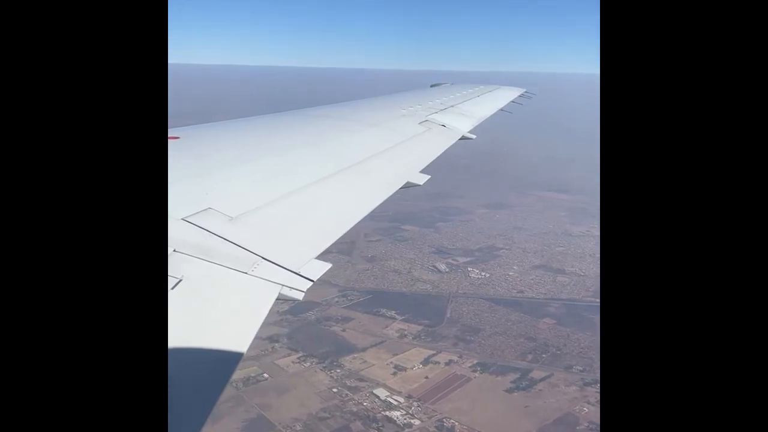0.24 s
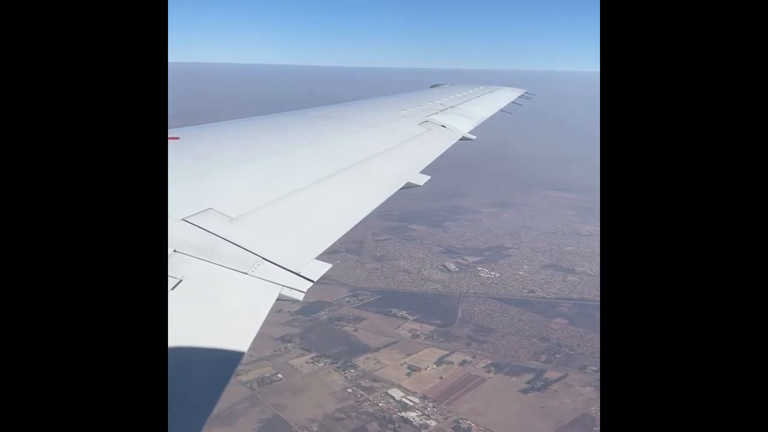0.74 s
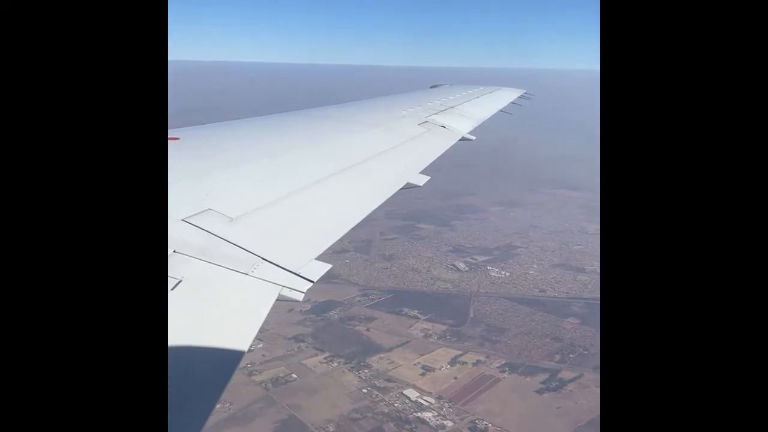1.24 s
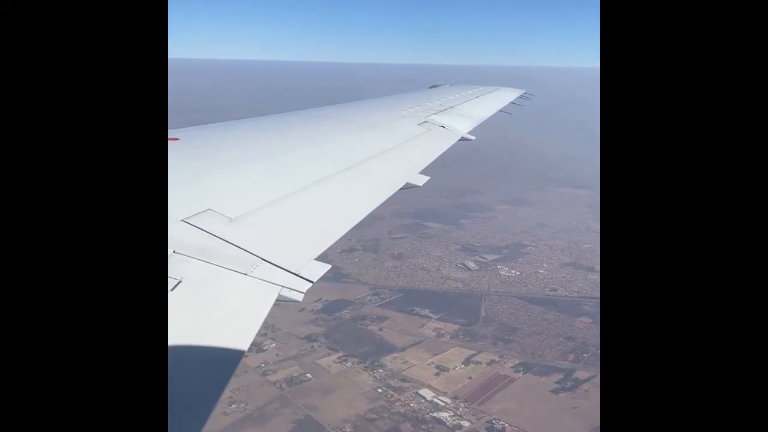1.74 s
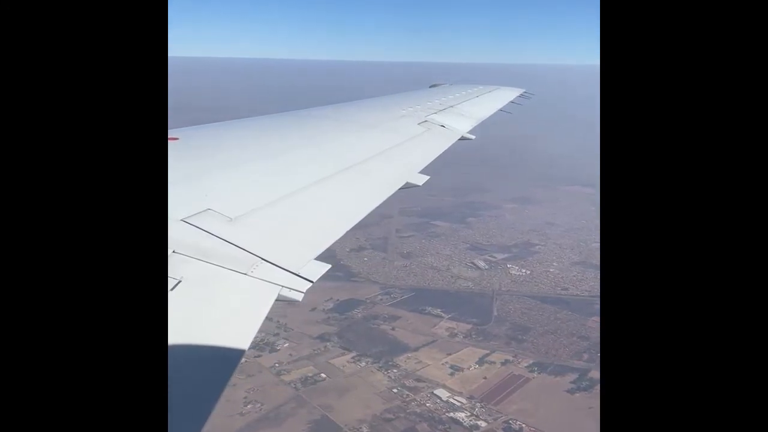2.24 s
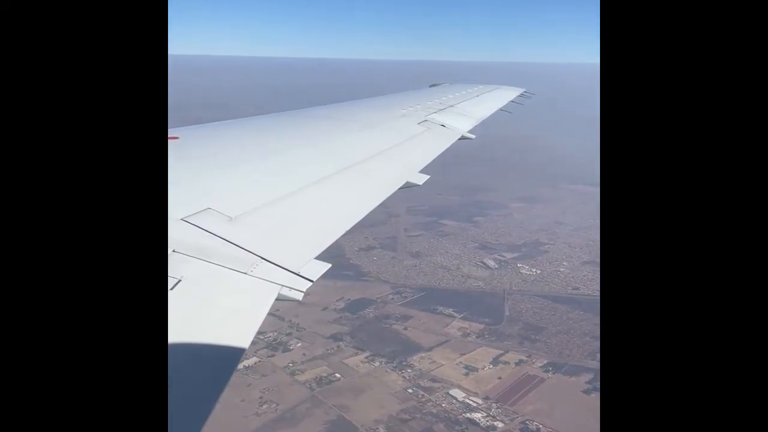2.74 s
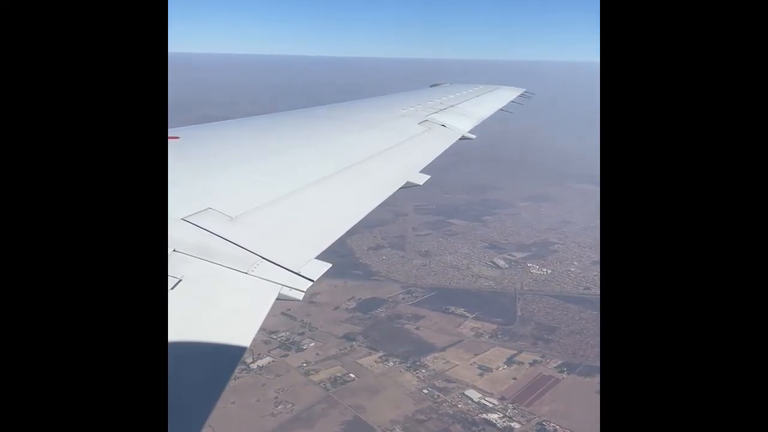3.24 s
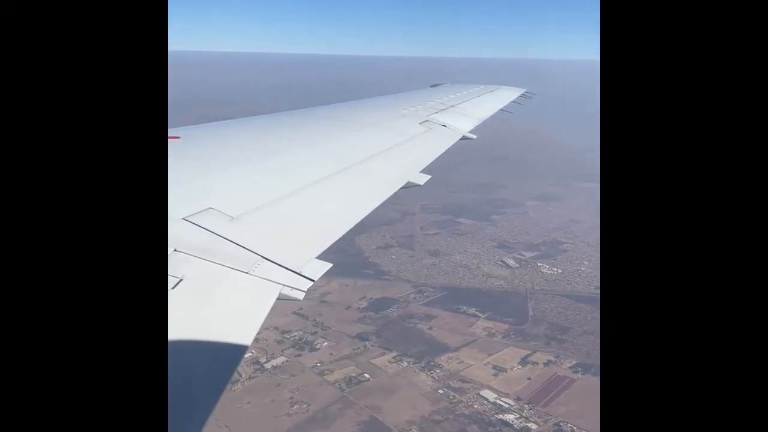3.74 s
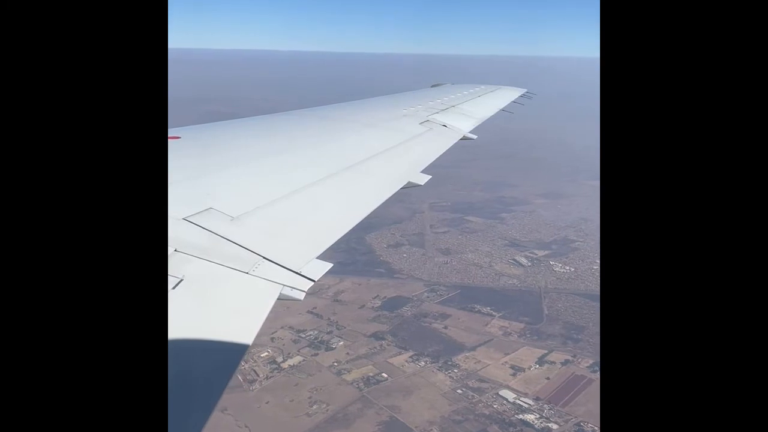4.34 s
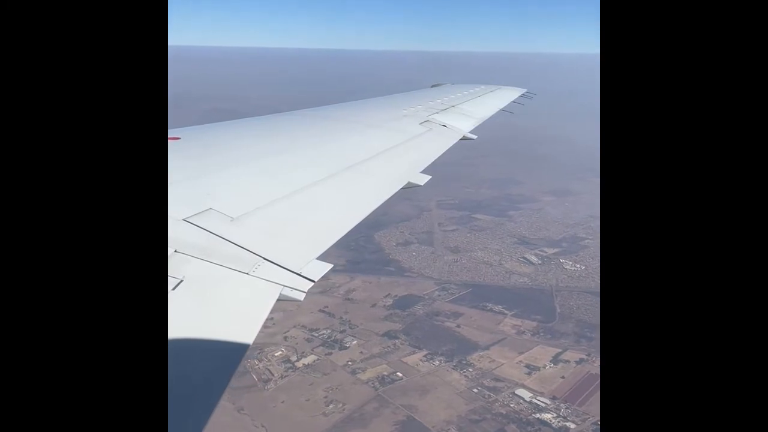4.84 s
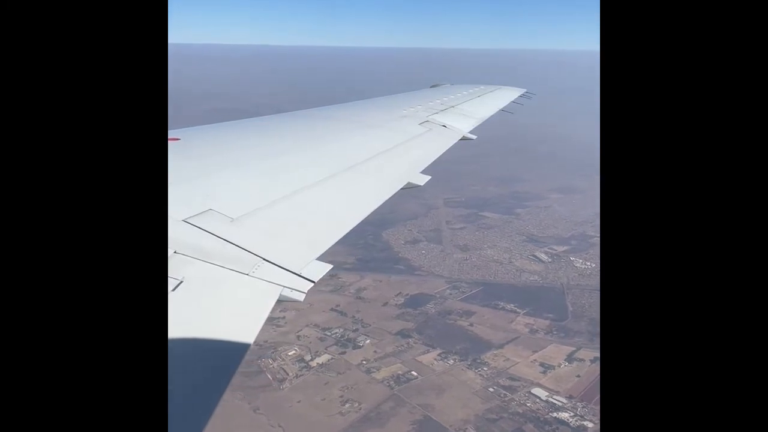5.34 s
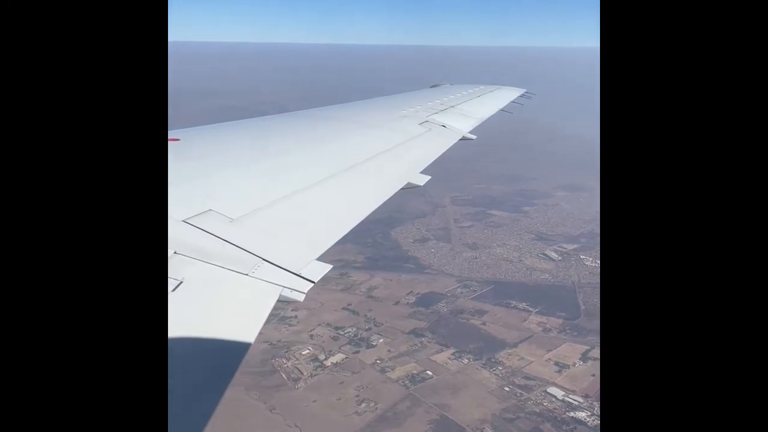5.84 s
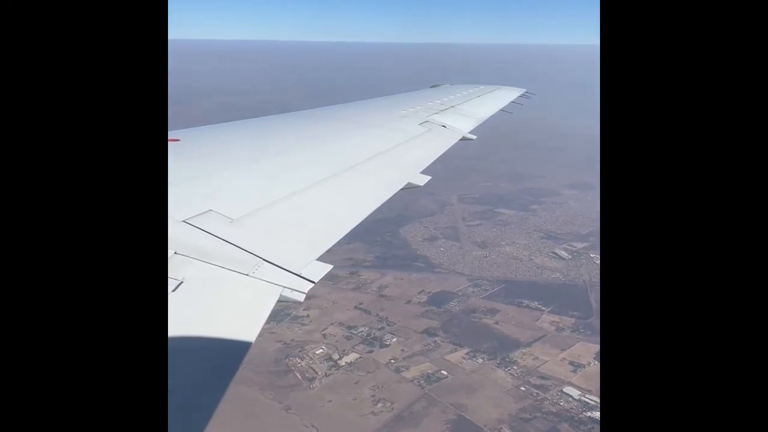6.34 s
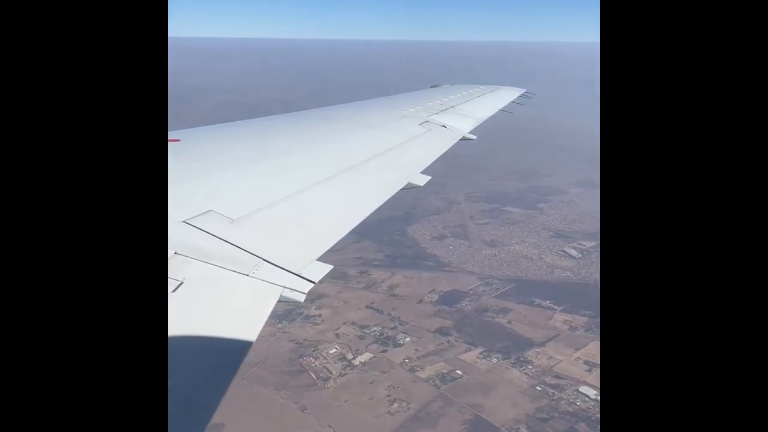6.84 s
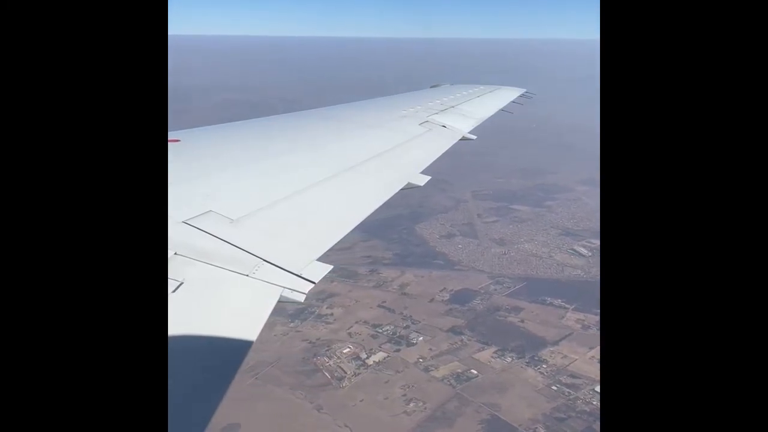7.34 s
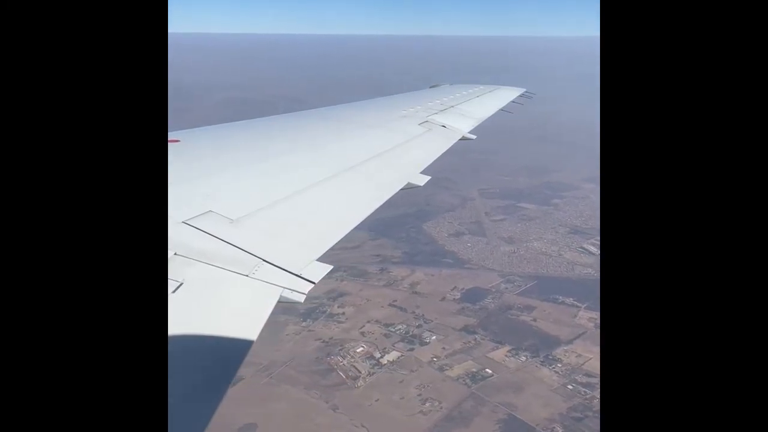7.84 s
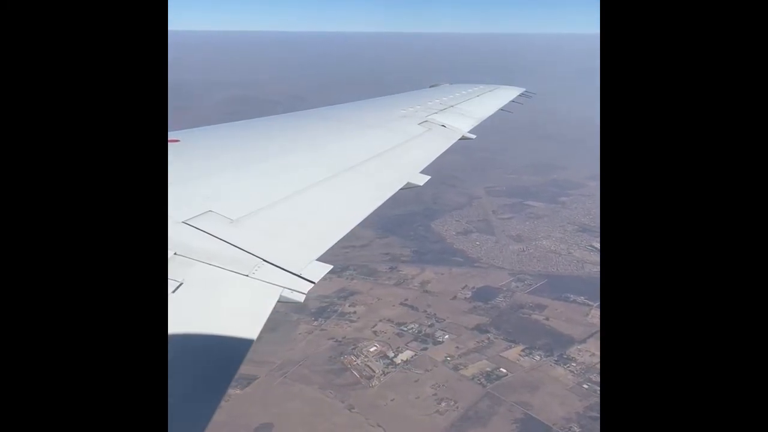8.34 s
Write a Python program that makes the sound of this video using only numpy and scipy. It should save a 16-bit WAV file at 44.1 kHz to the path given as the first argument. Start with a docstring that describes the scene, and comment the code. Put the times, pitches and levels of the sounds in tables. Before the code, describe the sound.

Inside a jet cabin at a window seat over the wing, a thick low roar of airflow and a steady engine hum run unchanged throughout, with soft air hiss and a faint thin whine. Small plastic creaks begin after two seconds; sharper snaps with hollow thuds cluster near 4.7, 5.5 and 7.3 seconds, then a last tiny click. Close stereo microphone in the cabin.

```python
"""A jet airliner in steady flight, heard from a window seat over the wing.
Throughout, filtered noise makes the roar of exhaust and airflow and the hiss of the cabin air, and sines
make the fan's hum on multiples of its shaft speed. A faster shaft whines faintly, swelling near 2.4 and 3.7 s.
From 2.3 s plastic creaks close by, as noise through its resonances; from 4.7 s it also snaps, as ringing modes
with a short crack, and thuds on a panel. Clusters fall near 4.7, 5.5 and 7.3 s, with a last click near 7.8 s."""
import sys
import numpy as np
from scipy.fft import rfft, irfft, next_fast_len
from scipy.io import wavfile
from scipy.ndimage import map_coordinates

SR = 44100
rng = np.random.default_rng(int(sys.argv[2]) if len(sys.argv) > 2 else 0)


def put_to_file(sound):
    """Save the sound as 16-bit audio at rate SR, in the file named by the first command-line argument."""
    columns = np.atleast_2d(sound).T  # one column per channel
    safe = np.clip(columns, -1, 1)
    whole_steps = np.round(safe * 32767)
    wavfile.write(sys.argv[1], SR, whole_steps.astype(np.int16))


N = 379701

# Cabin sound at the two microphones. Each row: frequency in Hz, coherence 0-1, left lead in rad,
# left-right difference in dB.
MIC_PAIR = [(35, 1, -0.6, -0.5), (80, 1, -0.04, -0.2), (160, 0.99, 0.07, -0.6), (266, 0.99, -0.4, -2.5),
            (482, 0.85, -0.6, -3), (756, 0.4, -0.7, -1), (930, 0.8, -1, -4.5), (1200, 0.6, -0.75, 0.5),
            (1550, 0.6, -0.8, -3.2), (2070, 0.79, -0.1, 3), (2500, 0.7, 2.5, -0.5), (3240, 0.3, 2.5, -0.5),
            (4200, 0.6, 0, -1.7), (5100, 0.29, 1.5, -2), (5800, 0.71, 2.5, -0.5), (6600, 0.7, 3.5, 2),
            (7400, 0.8, 9, -0.0), (9450, 0.9, 6, 0.0)]
# Resonances of the plastic. Each row: frequency in Hz, width in Hz, relative level in dB.
PLASTIC_MODES = [(794, 50, 1), (897, 50, 1.5), (1018, 45, 2), (1146, 55, 1), (1393, 60, -4), (1540, 75, -1),
                 (1700, 70, -3.5), (2010, 100, -7), (2266, 67, -7.5), (2630, 140, -13.5), (3390, 260, -14),
                 (4670, 400, -20.5)]


def amp(db):
    """Decibels to gain."""
    return 10 ** (np.asarray(db) / 20)


def unit(x):
    """Scale to rms 1."""
    return x / np.sqrt(np.mean(x ** 2) + 1e-20)


def along(points, hz):
    """Each column of a table by frequency, read on a log axis."""
    table_hz, *columns = np.transpose(points)
    return [np.interp(np.log(hz + 1), np.log(table_hz + 1), column) for column in columns]


def shape(points):
    """Gain of a (Hz, dB) spectrum as a function of frequency."""
    return lambda hz: amp(along(points, hz)[0])


def resonances(modes):
    """Causal response of (Hz, width in Hz, dB) modes, alternating in sign."""
    def response(hz):
        total = 0
        for k, (centre_hz, width_hz, db) in enumerate(modes):
            damping = 1j * hz * width_hz
            total = total + (-1) ** k * amp(db) * damping / (centre_hz ** 2 - hz ** 2 + damping)
        return total
    return response


def around(hz, centre_hz, spread_octaves):
    """Bell of gain about a centre on an octave axis."""
    return np.exp(-(np.log2((hz + 1) / centre_hz) / spread_octaves) ** 2 / 2)


def wobble(rate_hz):
    """Smooth random curve through rate_hz knots a second."""
    knots = rng.standard_normal(int(N * rate_hz / SR) + 4)
    return map_coordinates(knots, [np.arange(N) * rate_hz / SR])


def filtered(x, response):
    """x through a complex response of frequency."""
    n = x.shape[-1]
    m = next_fast_len(n + SR // 2)
    return irfft(rfft(x, m) * response(np.fft.rfftfreq(m, 1 / SR)), m)[..., :n]


def rung(force, response):
    """A force through a response scaled to keep the power of white noise."""
    gain = np.sqrt(np.mean(abs(response(np.fft.rfftfreq(SR // 2, 1 / SR))) ** 2))
    return filtered(force, response) / gain


def sides(value):
    """Half of a left-right difference for each microphone, opposite in sign."""
    return np.array([[1], [-1]]) * value / 2


def cabin_noise(colour):
    """Coloured stereo noise of rms 1, mixed from common and opposed parts to the cabin's coherence."""
    m = next_fast_len(N)
    hz = np.fft.rfftfreq(m, 1 / SR)
    coherence, lead_rad, pan_db = along(MIC_PAIR, hz)
    turn = np.arccos(np.clip(coherence, 0, 1)) / 2
    common, apart = rfft(rng.standard_normal((2, m)))
    pair = np.cos(turn) * common + 2 * sides(np.sin(turn) * apart)
    placed = pair * amp(sides(pan_db)) * np.exp(1j * sides(lead_rad))
    return unit(irfft(placed * colour(hz), m)[:, :N])


def tone(hz, clock_s, lead_rad):
    """Stereo sine of rms 1 on a given clock, reaching the left microphone lead_rad early."""
    cycles = hz * clock_s + rng.random()
    return np.sqrt(2) * np.sin(2 * np.pi * cycles + sides(lead_rad))


def engine_clock(drift, rate_hz):
    """Time as the shafts count it: the governor lets the speed wander very slightly."""
    return np.cumsum(1 + drift * wobble(rate_hz)) / SR


def swell():
    """Slow rise and fall of the whine in dB: it swells twice, then recedes."""
    # Each row: time in seconds, relative level in dB.
    swell_points = [(0.0, -0.5), (1.9, 1), (2.4, 6), (3.15, 0), (3.7, 6), (4.4, 4), (4.7, -2.5), (7.1, -2),
                    (8.6, -3.5)]
    return np.interp(np.arange(N) / SR, *np.transpose(swell_points))


def airflow(roar_db, boom_db, air_db, swell_share):
    """Exhaust and airflow roar through the wall and boom in the cabin; air hiss follows the whine's swell a little."""
    # Each row: frequency in Hz, relative level in dB per Hz.
    roar_spectrum = [(20, -36), (32, -29), (45, -11), (57, -0.5), (80, 1.5), (140, 0.5), (200, -2),
                     (275, -2.5), (330, -6.5), (400, -9.5), (470, -14.5), (640, -16.3), (900, -25.5),
                     (1500, -68.5), (3000, -110)]
    # Each row: frequency in Hz, relative level in dB per Hz.
    hiss_spectrum = [(500, -22.5), (1000, 1.5), (1300, -3.5), (1550, -9), (1720, -6), (1900, -15),
                     (2350, -15), (2800, -13.5), (3350, -17), (3900, -24), (4900, -21), (5300, -24.5),
                     (5800, -22.5), (6400, -26.5), (7300, -20), (7900, -35), (9500, -29), (10300, -39),
                     (13500, -36.5), (15600, -45.5)]
    # Narrow cabin booms. Each row: frequency in Hz, width in Hz, relative level in dB.
    boom_modes = [(60.77, 2.6, -34), (257.1, 22.2, -35)]

    sound = amp(roar_db) * cabin_noise(shape(roar_spectrum))
    for hz, width_hz, db in boom_modes:
        resonance = resonances([(hz, width_hz, 0)])
        sound += amp(db + boom_db) * cabin_noise(lambda f: resonance(f) ** 2)
    hiss = cabin_noise(shape(hiss_spectrum))
    return sound + amp(air_db + swell_share * swell()) * hiss


def whine(clock_s, waver_db, jitter_s):
    """Thin, unsteady tones of the faster shaft share a slow swell; a weak neighbour makes one beat."""
    shaft_hz = 846.1
    # Each row: shaft order, left lead in rad, left-right difference in dB, relative level in dB,
    # share of the swell, fade in dB per second.
    whine_tones = [(2, -0.5, -0.5, -56.5, -0.12, -0.5), (3, 1, -3, -60.5, 1, 0),
                   (5, 0.8, 2, -62, 0.25, 0.66), (6, 0.4, 0.5, -71, 0.074, 0), (7, 3.5, 0, -65.5, 0.1, 0)]
    # Weak tone beside one order: order (rounded to the nearest even on a tie, so 5.5 gives 6), offset in Hz,
    # relative level in dB, left lead in rad.
    beat_order, offset_hz, beat_db, beat_lead_rad = (5.5, -7, -8, 2)

    shaken_s = clock_s + jitter_s * wobble(rate_hz=32)
    swell_db = swell()
    from_middle_s = (np.arange(N) - N / 2) / SR
    tones = np.zeros((2, N))
    for order, lead_rad, pan_db, db, share, fade_db_per_s in whine_tones:
        hz = round(order) * shaft_hz
        slow_db = share * swell_db - fade_db_per_s * from_middle_s
        gain = amp(db + sides(pan_db) + slow_db + waver_db * wobble(rate_hz=28))
        tones += gain * tone(hz, shaken_s, lead_rad)
        if round(order) == round(beat_order):
            tones += gain * amp(beat_db) * tone(hz + offset_hz, clock_s, beat_lead_rad)
    return tones


def fan(clock_s, waver_db, waver_db_per_khz):
    """Unequal blades sound every shaft multiple, strong tones over faint buzz; higher tones waver more."""
    shaft_hz, top_order = 124.8, 60
    buzz_2khz_db, buzz_fall_db_per_octave, buzz_scatter_db = -72, 5, 2
    # Tones that stand out. Each row: shaft order, level in dB, left-right difference in dB, left lead in rad.
    fan_tones = [(1, -19, -0.75, 0.09), (4, -35, -3, -0.9), (5, -42, -7.0, -1), (6, -46, -11, -2.5),
                 (8, -54.5, -6, 1), (10, -54, 3.5, -1.1), (11, -59.0, -9, -0.7), (12, -61, -4, -0.8),
                 (14, -52.5, -1.5, -0.4), (16, -63.5, 0, 0.5), (18, -59, -9.2, 1.6), (19, -71, -3.5, 1.7),
                 (20, -71, 7, -1.2), (21, -70.5, 0, 3.5), (22, -51.5, -2.7, 2), (23, -69.5, -7, 2.5),
                 (24, -55, 5, -3), (25, -62, 3.5, 1.5), (27, -73.5, 0.5, 3), (28, -72, -1.5, 2),
                 (29, -67.5, -8, -3.5), (30, -71.5, -6.5, 2.5), (31, -71, -4.5, 0.8), (35, -68.5, 1.5, 2.3),
                 (36, -67.5, -7, 2), (38, -67, -3, 0.7), (39, -68, -12.5, -2.5), (40, -67, -1, -2.1),
                 (41, -74, -3, 1.5), (45, -71, -2.2, 1.5), (48, -65, -4, -3), (51, -71, 0.5, -2),
                 (55, -71, -1.5, -1), (58, -73, 0, -1.5)]

    flutter = [wobble(rate_hz=3.5) for _ in range(11)]
    strong = {round(order): row for order, *row in fan_tones}
    hum = np.zeros((2, N))
    for order in range(1, top_order + 1):
        hz = order * shaft_hz
        _, buzz_lead_rad, buzz_pan_db = along(MIC_PAIR, hz)
        buzz_db = buzz_2khz_db - buzz_fall_db_per_octave * np.log2(hz / 2000)
        buzz_db += buzz_scatter_db * rng.standard_normal()
        db, pan_db, lead_rad = strong.get(order, (buzz_db, buzz_pan_db, buzz_lead_rad))
        depth_db = waver_db + waver_db_per_khz * hz / 1000
        waver = np.array([flutter[k] for k in rng.integers(len(flutter), size=2)])
        hum += amp(db + sides(pan_db) + depth_db * waver) * tone(hz, clock_s, lead_rad)
    return hum


def creaks(rise_s, t60_s, tail_db, tail_t60_s, grain_db, apart):
    """Each slip is a grainy rasp ringing the plastic around its own centre; the cabin adds a brief tail."""
    # Each row: start in seconds, length in seconds, relative level in dB, centre in Hz, spread in octaves,
    # relative scratch level in dB.
    slips = [(2.333, .025, -49, 2200, .7, -62), (2.66, 0.046, -43.5, 2100, 0.8, -56.5),
             (4.16, 0.018, -40, 2500, 0.8, -51), (4.752, 0.074, -45, 2300, 1.5, -62),
             (5.473, 0.018, -40, 2300, 0.76, -47), (5.495, 0.019, -32.5, 1700, 1.2, -44),
             (5.519, .013, -32, 1800, 0.99, -38.5), (7.252, 0.021, -37, 1900, 0.6, -50)]
    # Scratch of the slipping edge. Each row: frequency in Hz, relative level in dB per Hz.
    scratch_spectrum = [(1500, -28), (3400, -1), (5000, 1.5), (6200, -5.5), (7400, -1.5), (11000, -10),
                        (15500, -15)]

    age_s = np.arange(SR // 2) / SR
    grain = unit(amp(grain_db * wobble(rate_hz=420)))
    plastic = resonances(PLASTIC_MODES)
    sound = np.zeros((2, N))
    for start_s, length_s, db, centre_hz, spread_octaves, scratch_db in slips:
        start = round(start_s * SR)
        near = slice(start, start + len(age_s))
        after_s = np.maximum(age_s - length_s, 0)
        decay = amp(-60 * after_s / t60_s) + amp(tail_db - 60 * after_s / tail_t60_s)
        envelope = (1 - np.exp(-age_s / rise_s)) * decay
        common = rng.standard_normal(len(age_s))
        noise = unit(common + apart * rng.standard_normal((2, len(age_s))))
        rasp = envelope * grain[near] * noise
        body = rung(rasp, lambda f: plastic(f) * around(f, centre_hz, spread_octaves))
        scratch = rung(rasp, shape(scratch_spectrum))
        sound[:, near] += amp(db) * body + amp(scratch_db) * scratch
    return sound


def knocks(rise_s):
    """Blows on the panel behind the plastic ring its low modes: short hollow thuds."""
    # Each row: start in seconds, relative level in dB.
    blows = [(4.735, -11.5), (5.499, -12.5), (5.521, -3.5), (7.271, -15.5)]
    # Each row: frequency in Hz, relative level in dB, t60 in seconds.
    panel_modes = [(225, 0, 0.07), (318, -3, 0.05), (490, -4.5, 0.077), (681, -6, 0.051)]

    age_s = np.arange(SR // 2) / SR
    sound = np.zeros(N)
    for start_s, db in blows:
        ring = np.zeros(len(age_s))
        for hz, mode_db, t60_s in panel_modes:
            ring += amp(mode_db - 60 * age_s / t60_s) * np.sin(2 * np.pi * (hz * age_s + rng.random()))
        sound[round(start_s * SR):][:len(age_s)] += amp(db) * (1 - np.exp(-age_s / rise_s)) * ring
    return sound


def snaps(rise_s, crack_t60_s, scatter_db, lead_spread_rad):
    """The plastic lets go at once: a short crack, and its modes near the snap's centre ring freely."""
    # Each row: start in seconds, relative level in dB, centre in Hz, spread in octaves, relative crack level in dB.
    snap_events = [(4.735, -14.5, 900, 1.0, -31.5), (4.7365, -22.5, 3500, .3, -44),
                   (4.742, -21.5, 1700, .9, -35), (4.7525, -25, 1500, .5, -50),
                   (5.5197, -17.5, 1570, .15, -47.5), (5.5252, -19.5, 2250, 0.28, -39),
                   (5.53, -20, 1050, 0.43, -39), (7.2545, -21.5, 1700, .45, -42),
                   (7.2615, -28, 2500, 0.26, -46), (7.2715, -20, 1090, 0.28, -47.5),
                   (7.645, -26, 1500, .7, -42.5), (7.655, -30, 1100, .5, -51),
                   (7.812, -33.5, 2000, .4, -60)]
    # Each row: frequency in Hz, relative level in dB per Hz.
    crack_spectrum = [(600, -20), (1500, 0), (3500, -0.5), (5000, -5.5), (6200, -17.5), (9000, -20),
                      (15500, -30)]

    age_s = np.arange(SR // 4) / SR
    mode_hz, width_hz, mode_db = np.transpose(PLASTIC_MODES)
    sound = np.zeros((2, N))
    for start_s, db, centre_hz, spread_octaves, crack_db in snap_events:
        scattered_db = mode_db + scatter_db * rng.standard_normal(len(mode_hz))
        gains = width_hz * amp(scattered_db) * around(mode_hz, centre_hz, spread_octaves)
        gains /= np.linalg.norm(gains)
        ring = np.zeros((2, len(age_s)))
        for hz, width, gain in zip(mode_hz, width_hz, gains):
            lead_rad = lead_spread_rad * rng.standard_normal()
            ring += gain * np.exp(-np.pi * width * age_s) * tone(hz, age_s, lead_rad)
        burst = amp(-60 * age_s / crack_t60_s) * rng.standard_normal((2, len(age_s)))
        crack = rung(burst, shape(crack_spectrum))
        onset = 1 - np.exp(-age_s / rise_s)
        sound[:, round(start_s * SR):][:, :len(age_s)] += onset * (amp(db) * ring + amp(crack_db) * crack)
    return sound


def scene():
    """Air, engine tones and plastic trim at the seat."""
    clock_s = engine_clock(drift=0.0002, rate_hz=1.5)
    air = airflow(roar_db=-17.5, boom_db=4.5, air_db=-43.0, swell_share=0.086)
    engine = whine(clock_s, waver_db=2.5, jitter_s=0.000011)
    engine += fan(clock_s, waver_db=0.24, waver_db_per_khz=0.27)
    trim = creaks(rise_s=0.0015, t60_s=0.041, tail_db=-12.5, tail_t60_s=0.22, grain_db=2.0, apart=0.94)
    trim += knocks(rise_s=0.0037)
    trim += snaps(rise_s=0.00056, crack_t60_s=0.085, scatter_db=0.7, lead_spread_rad=1.43)
    trim_pan_db = -1.5  # left-right: a little to the right
    return air + engine + amp(sides(trim_pan_db)) * trim


def record(dry):
    """The microphone keeps nothing above its band limit; short fades soften both ends."""
    top_hz, fade_s = 15700, 0.002
    edge_s = np.minimum(np.arange(N), np.arange(N)[::-1]) / SR
    faded = dry * np.minimum(edge_s / fade_s, 1)
    return filtered(faded, lambda hz: hz < top_hz)


dry = scene()
out = record(dry)
put_to_file(out)
```